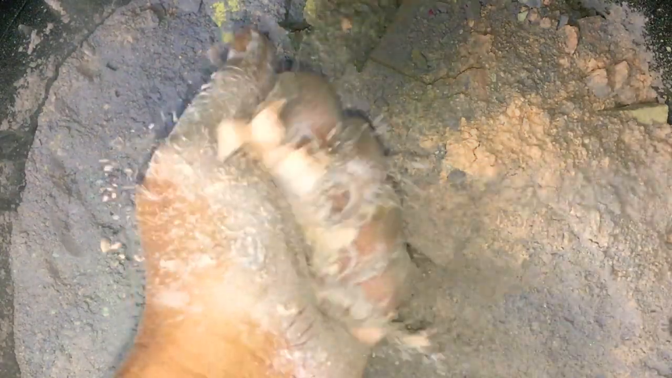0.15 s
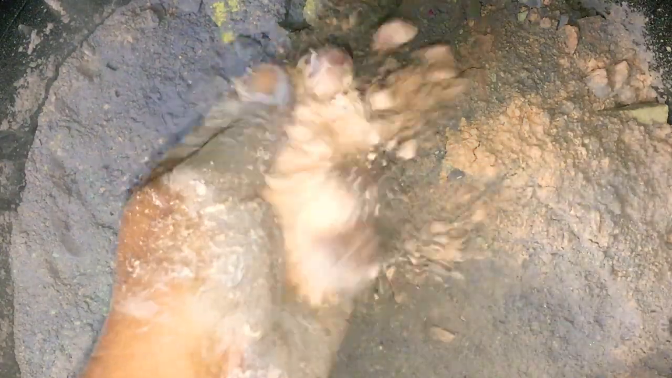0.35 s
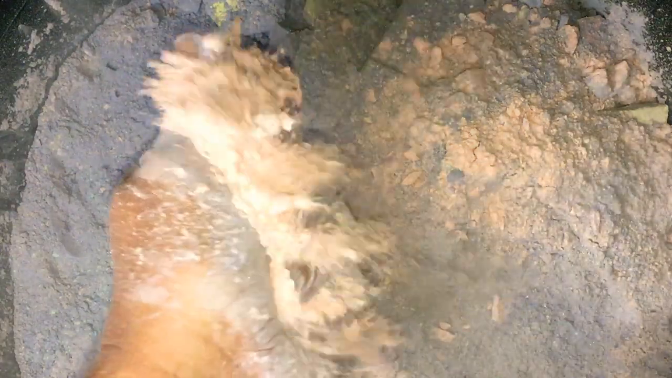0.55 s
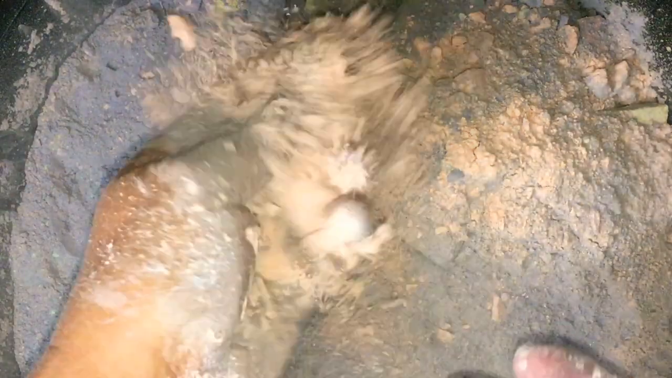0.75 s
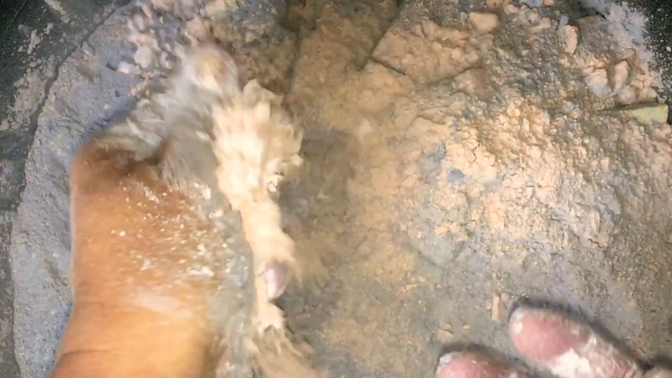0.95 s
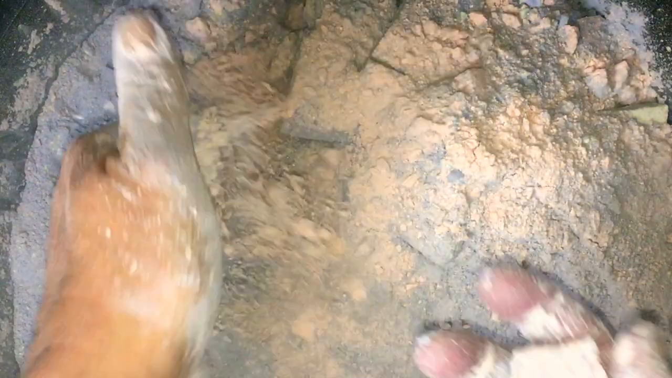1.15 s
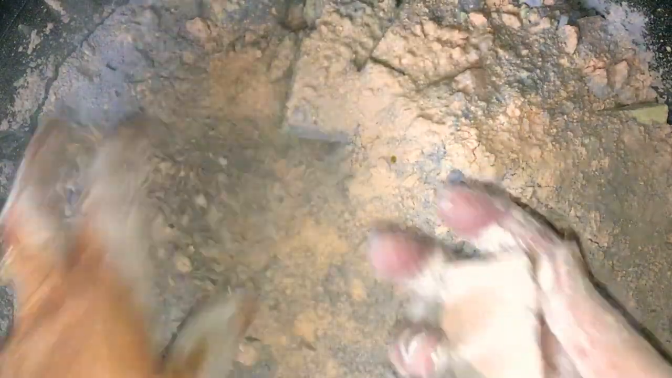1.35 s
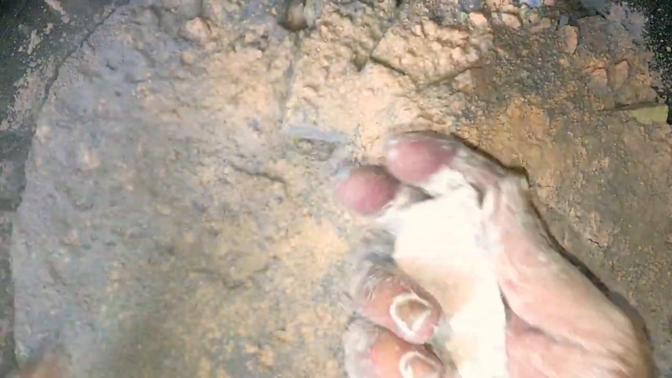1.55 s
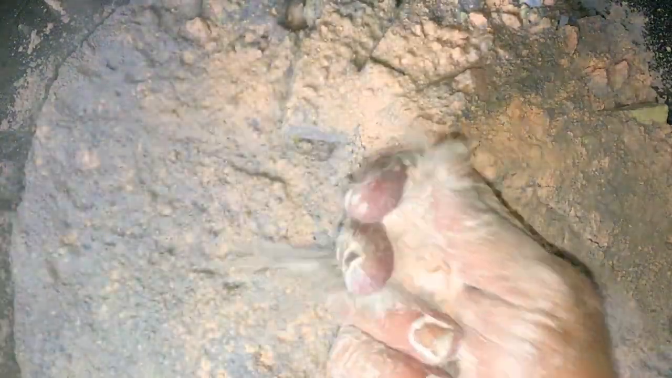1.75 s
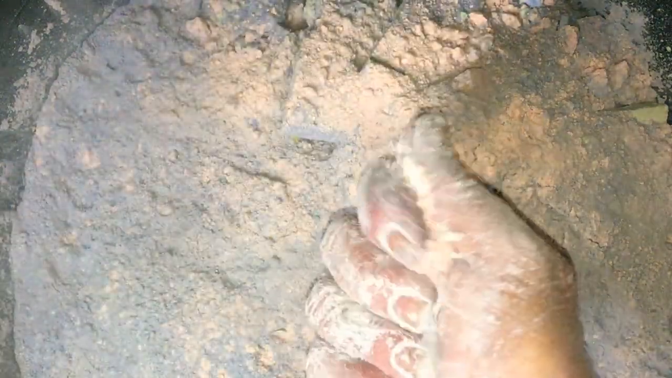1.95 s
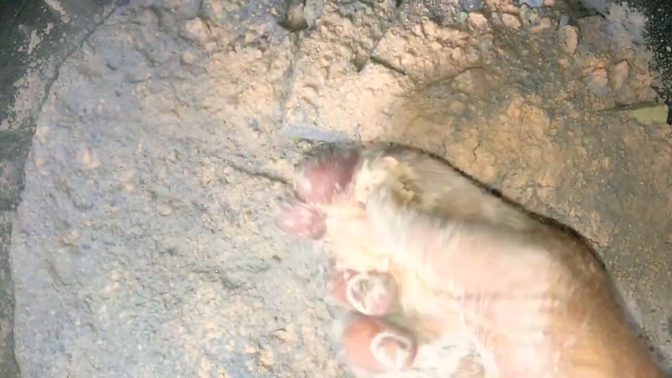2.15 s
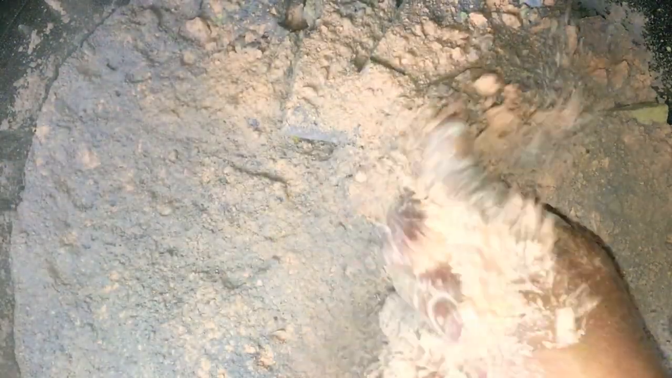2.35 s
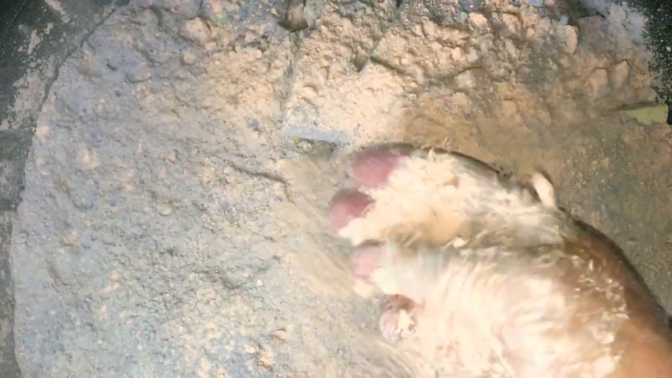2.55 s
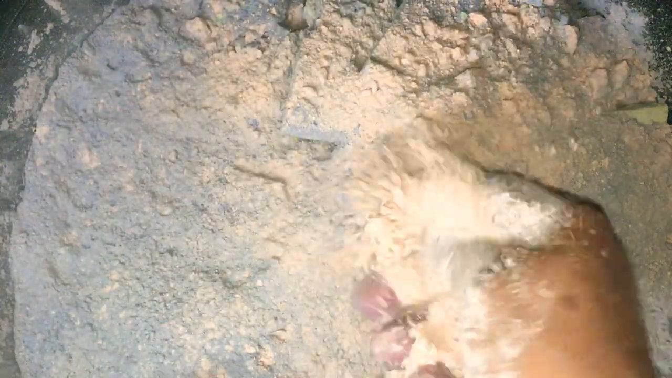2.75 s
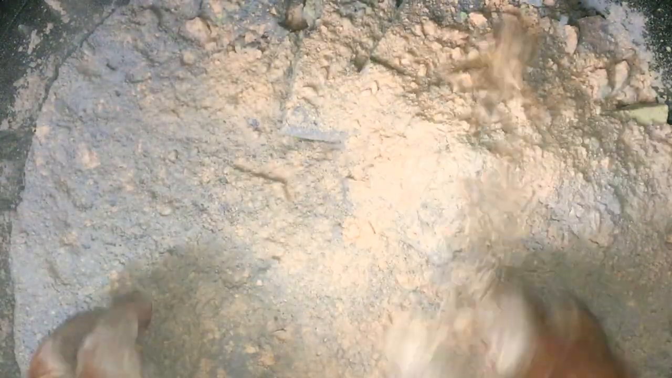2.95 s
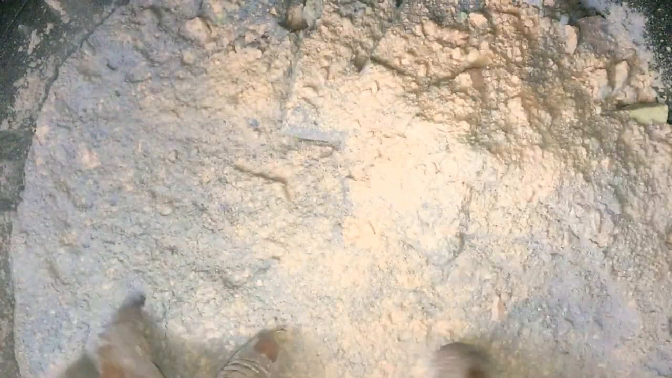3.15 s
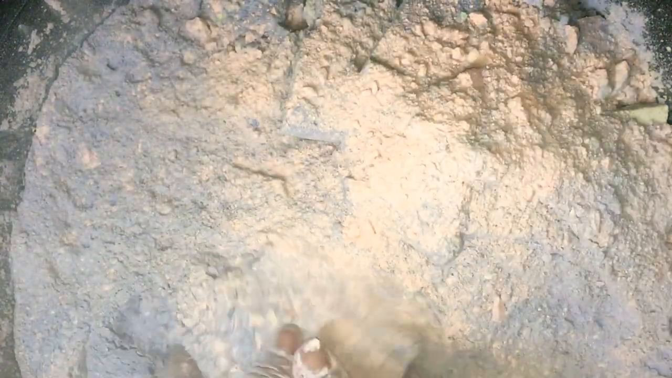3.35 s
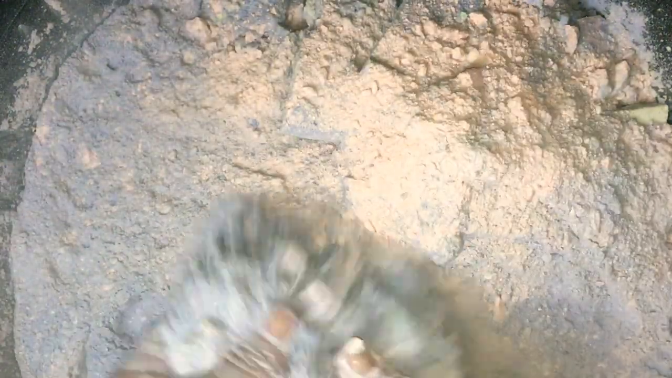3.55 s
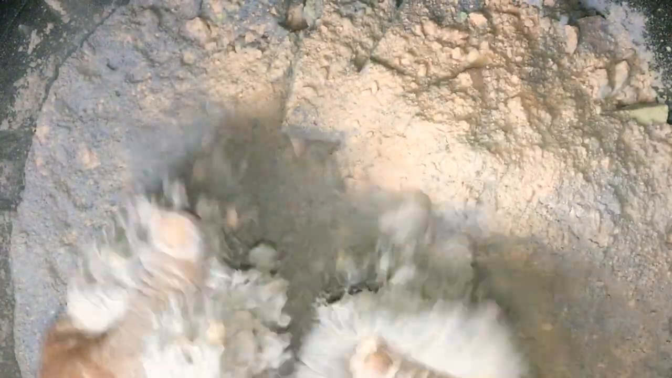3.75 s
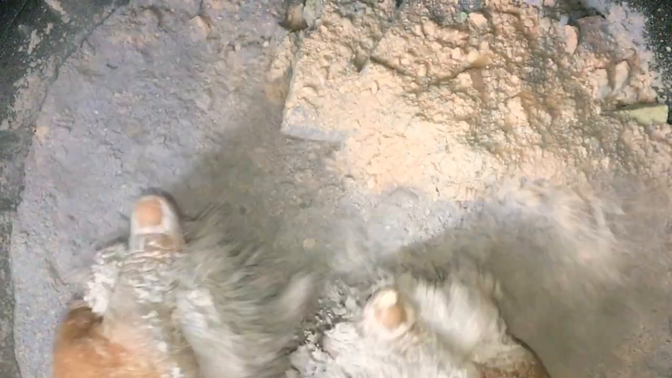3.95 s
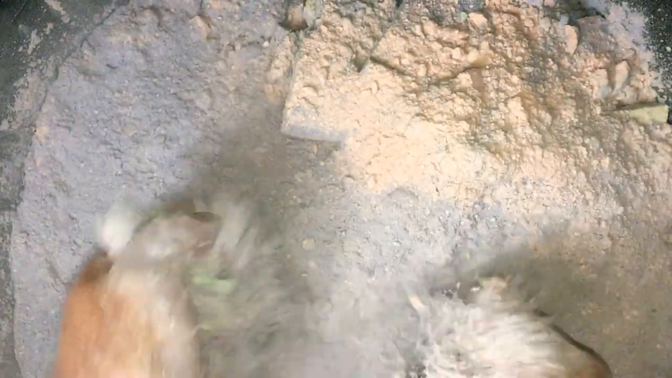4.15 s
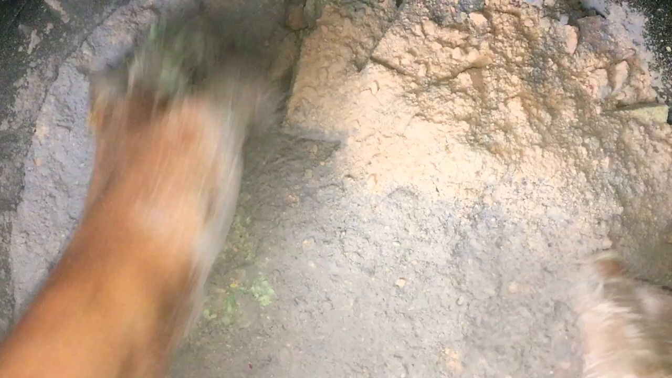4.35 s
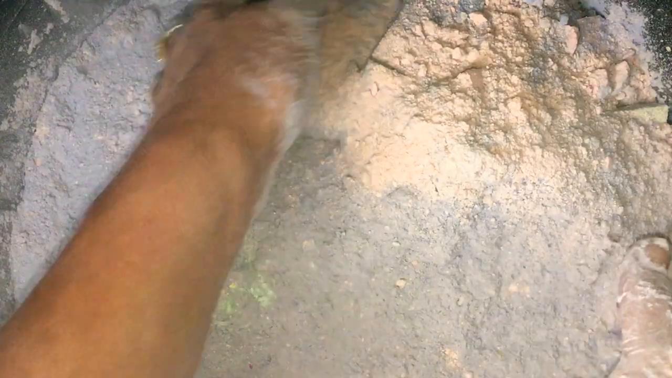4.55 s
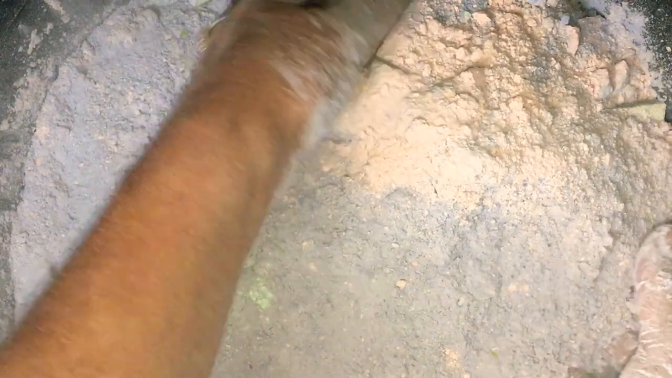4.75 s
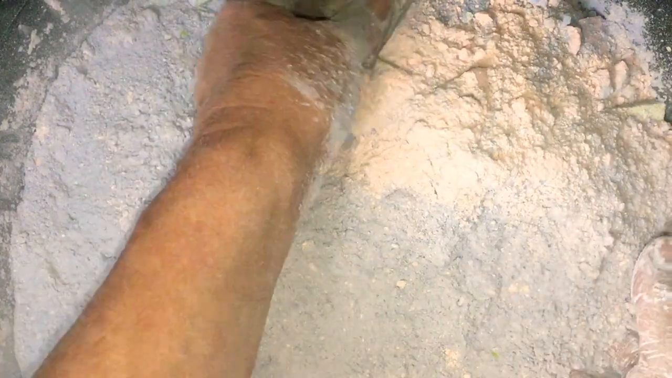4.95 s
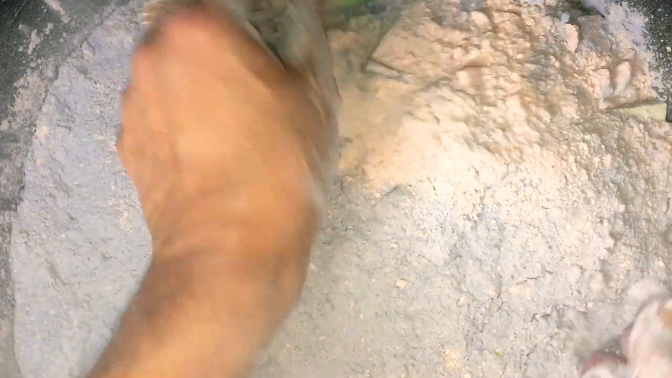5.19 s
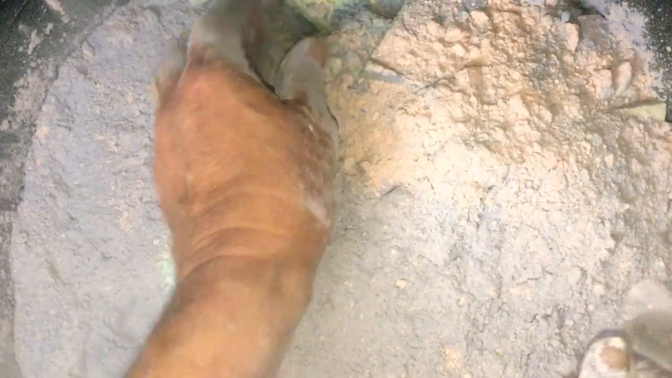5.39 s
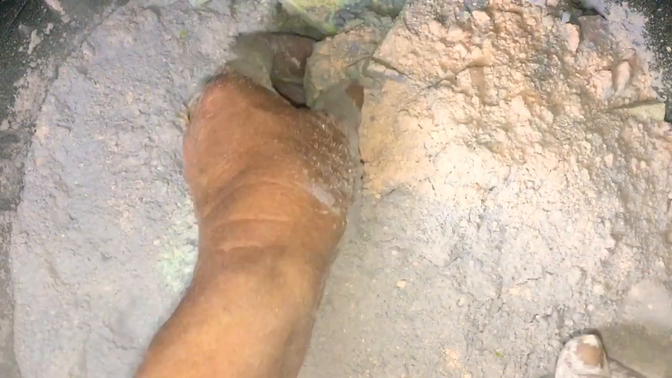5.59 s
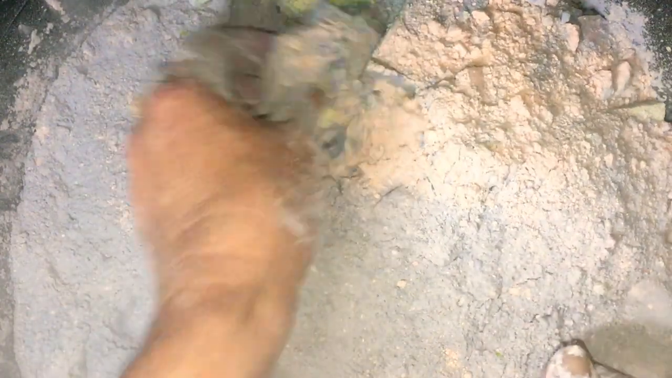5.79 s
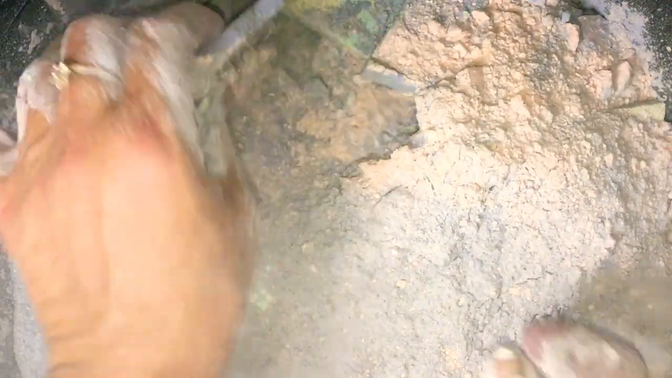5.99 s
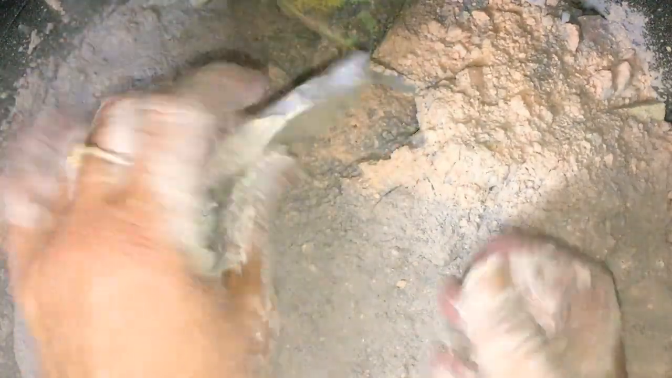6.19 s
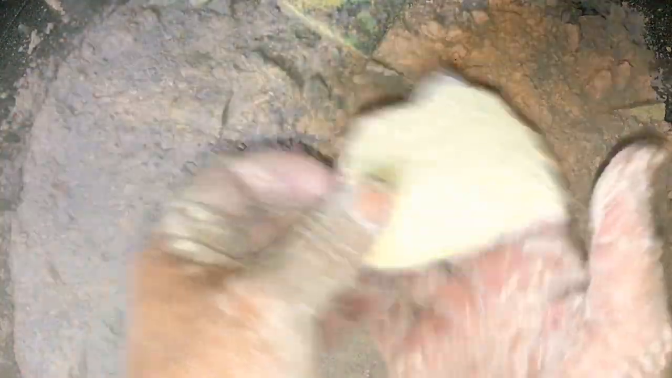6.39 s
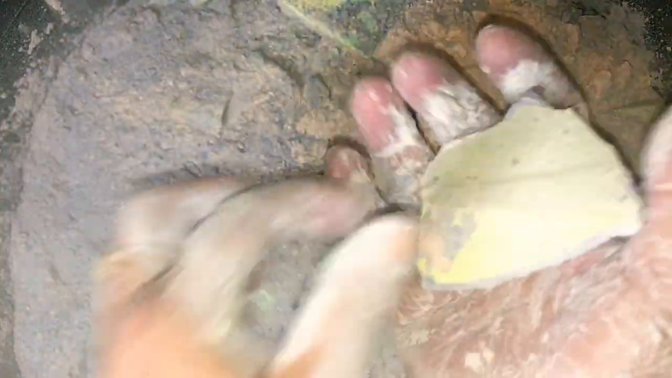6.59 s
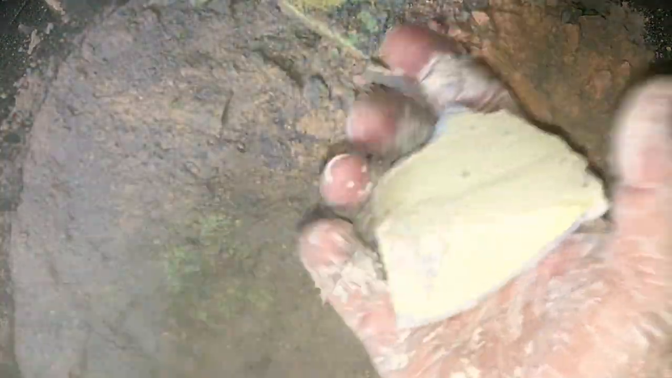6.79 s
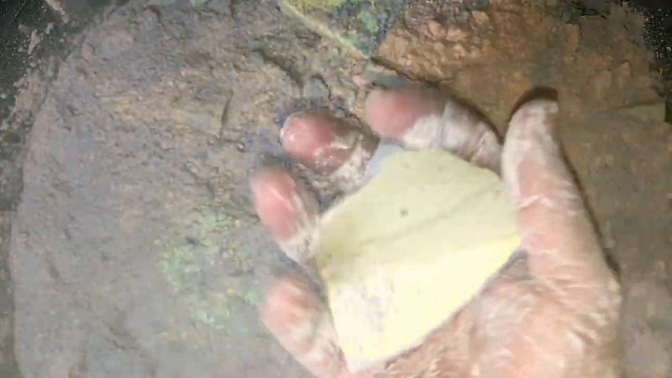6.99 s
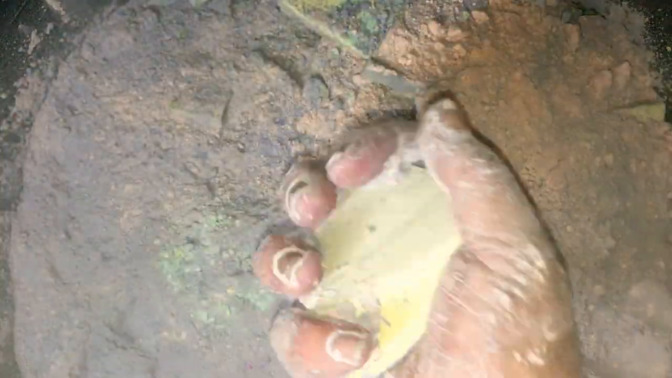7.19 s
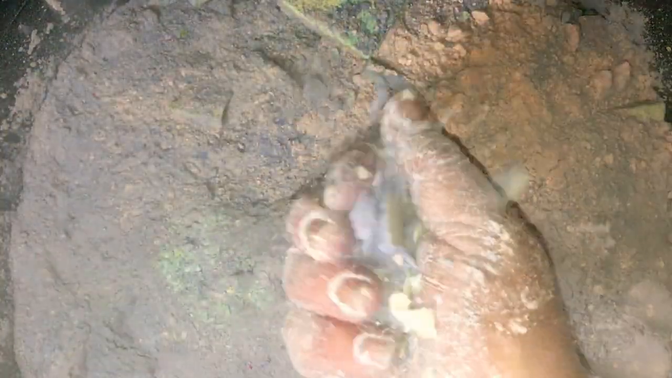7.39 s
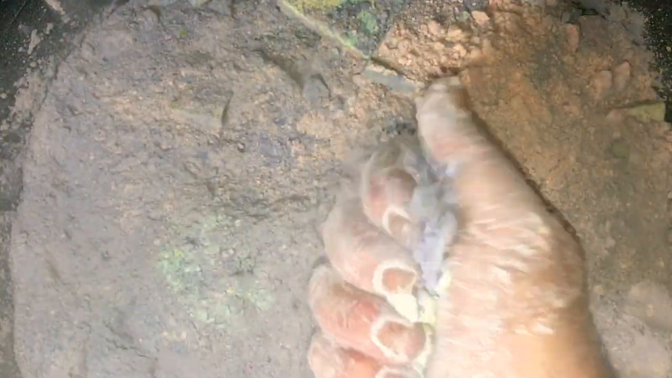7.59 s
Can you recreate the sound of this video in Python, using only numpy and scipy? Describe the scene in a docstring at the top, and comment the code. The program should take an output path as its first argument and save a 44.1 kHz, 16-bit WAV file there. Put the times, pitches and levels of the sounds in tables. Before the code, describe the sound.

Close-up brittle chalk crumbling and soft powder rustling, building to noisy scrabbling with hard knocks and low thuds, then quiet rubbing and a final crunch.

```python
"""Crushing dry gym chalk

Hands crush dry chalk over a tub of loose powder, close to a small microphone.
Lumps snap as decaying modes, powder crumbles as trains of tiny fractures, and chalky skin hisses as shaped noise.
A hand digs through the heap and knocks one block against another; fingers squeak in narrow noise bands.
Low-frequency noise and thuds form the rumble of moving air, present throughout."""
import sys
import numpy as np
from scipy import signal
from scipy.io import wavfile
from scipy.ndimage import uniform_filter1d

SR = 44100
rng = np.random.default_rng(int(sys.argv[2]) if len(sys.argv) > 2 else 0)


def pcm_store(signal):
    """Save signal as 16-bit PCM."""
    levels = np.round(np.clip(np.atleast_2d(signal), -1, 1) * 32767)
    wavfile.write(sys.argv[1], SR, levels.astype(np.int16).T)


N = 336483
TIME = np.arange(N) / SR

# spectrum of powder sheared by skin, also of flying grit: (f/Hz, relative density/dB per Hz)
SKIN_SPECTRUM = [(400, -22.5), (1500, -5.5), (2500, -4.5), (3200, -3), (4300, -1.5), (5000, -2),
                 (6200, -1.5), (8800, -2), (10500, -10), (13000, -19.5), (16000, -28)]


def amp(db):
    """Level definition: an amplitude ratio is 10 to the power dB/20."""
    return 10 ** (np.asarray(db) / 20)


def unit(x):
    """Normalisation to unit root-mean-square value."""
    return x / np.sqrt(np.mean(x ** 2) + 1e-20)


def follow(rows, axis):
    """Linear interpolation of one column of a curve table, sample by sample."""
    rows = np.asarray(rows)
    return np.interp(TIME, rows[:, 0], rows[:, axis])


def add(mix, s, sound):
    """Superposition: a sound is summed into the mix from time s."""
    part = mix[max(round(s * SR), 0):][:len(sound)]
    part += sound[:len(part)]


def colour(x, spectrum, size=8192):
    """Minimum-phase filtering: a causal response of given spectrum keeps the fronts of clicks sharp."""
    hz, db = np.transpose(spectrum)
    bin_hz = abs(np.fft.fftfreq(size, 1 / SR)) + 1
    log_gain = np.log(amp(np.interp(np.log(bin_hz), np.log(hz), db)))
    # the Hilbert transform of the log gain supplies the phase
    transfer = np.exp(np.conj(signal.hilbert(log_gain)))
    response = np.fft.ifft(transfer).real[:size // 2]
    return unit(signal.oaconvolve(x, response)[:len(x)])


def waver(per_s):
    """Random modulation of unit size: straight lines join per_s Gaussian values a second."""
    knots = rng.standard_normal(4096)
    return unit(np.interp(TIME * per_s, np.arange(len(knots)), knots))


def grains(count, per_s, spread_db):
    """Shot noise: sparse impulses of random sign, their levels spread exponentially in dB."""
    size = amp(spread_db * np.minimum(rng.exponential(1, count), 4.5))
    sign = rng.choice([-1., 1.], count)
    return unit(size * sign * (rng.random(count) < per_s / SR))


def struck(x, db):
    """Impact level: the root-mean-square value of the first 10 ms is set to db."""
    return amp(db) * x / np.sqrt(np.mean(x[:SR // 100] ** 2) + 1e-20)


def swell(middle, length):
    """Pressure pulse of one stroke: it builds, peaks and eases off, spanning length between its 1/e points."""
    fall_share, shape = 0.52, 1.65  # part of the length spent easing off; higher shape is flatter on top
    dt = TIME - middle
    reach = abs(dt) / (length * np.where(dt > 0, fall_share, 1 - fall_share))
    near, out = reach < 4, np.zeros(N)
    out[near] = np.exp(-reach[near] ** shape)
    return out


def handwork():
    """Power addition of strokes and sliding: drives of crumbling and hiss, and hiss-weighted treble lift in dB."""
    # loose powder that keeps sliding: (t/s, crumbling drive/dB, hiss drive/dB, treble lift by fine dust/dB)
    sliding = [(0, -63.5, -61.5, 0), (.37, -61.5, -62, 1), (.6, -55.5, -57.5, 1.5), (1.2, -62, -63, 4),
               (1.33, -67, -66.5, -2.5), (1.65, -66, -68.5, 2.5), (2.3, -66.5, -67, 2),
               (2.7, -62.5, -63.5, 0.5), (3.04, -65.5, -68, 0), (3.5, -58.5, -74, 2.5),
               (3.68, -57, -71, -3.5), (3.86, -51.5, -59, -8.5), (4.42, -58, -63, -7.5),
               (4.65, -46, -51.5, 0.5), (5.87, -52.5, -62.5, 3), (6.15, -71.5, -76, 4.5),
               (7.24, -70.5, -67.5, 3), (7.63, -59.5, -59.5, -1.5)]
    # squeezes, rubs and digs of the hand:
    # (middle t/s, length/s, crumbling drive/dB, hiss drive/dB, treble lift by fine dust/dB)
    strokes = [(0.021, 0.16, -48, -57.5, 3), (0.166, 0.043, -58, -56, -0.5), (0.293, 0.067, -58, -51, 5.5),
               (0.463, 0.095, -49, -58, 1.5), (0.746, .09, -58.5, -54, 3), (0.877, 0.14, -51, -50.5, -6.5),
               (1.034, 0.077, -55, -59, 3), (1.137, 0.24, -61.5, -53.5, 3), (1.276, 0.047, -57, -49.5, 7),
               (1.42, 0.076, -59, -65, -11), (1.798, 0.097, -50, -59, 0), (1.968, 0.2, -58, -62.5, -1),
               (2.109, 0.028, -66, -48, 8), (2.162, 0.096, -63, -54, 7.5), (2.28, 0.071, -58, -55.5, 3.5),
               (2.388, 0.091, -58, -51.5, 8.5), (2.493, 0.11, -60.5, -50, 3), (2.708, 0.031, -57.5, -64, 2),
               (2.852, 0.084, -65, -49.5, -3), (3.107, 0.033, -49.5, -55.5, -0.5),
               (3.164, 0.028, -43.5, -55, 4.5), (3.22, 0.11, -45, -43, 5), (3.31, 0.12, -40.5, -46, -2),
               (3.414, 0.1, -53.5, -53, 0), (4.02, 0.24, -49.5, -59, -9.5), (4.231, 0.12, -56.5, -49.5, 3),
               (4.447, 0.021, -45, -59, 0), (4.538, 0.066, -35.5, -46, -0.5),
               (4.626, 0.073, -34, -39.5, 2.5), (4.768, 0.086, -36, -43, 2.5), (4.83, 0.057, -42, -50, 3),
               (4.979, 0.019, -37.5, -36.5, 6.5), (5.096, .1, -46, -44, 2), (5.157, 0.033, -36, -40.5, 0),
               (5.188, 0.033, -48, -38.5, 2), (5.259, 0.087, -39, -46.5, 2),
               (5.342, 0.076, -34.5, -43, 2.5), (5.48, 0.024, -39, -52, 4), (5.592, 0.081, -46, -52.5, 6),
               (5.64, 0.13, -43.5, -52.5, 7), (5.784, 0.061, -46.5, -53, 6.5),
               (5.917, 0.033, -44, -53.5, -2), (6, .1, -57.5, -65.5, -2.5), (6.53, 0.019, -55.5, -53.5, 8),
               (6.581, 0.053, -72, -52.5, 8.5), (6.635, 0.016, -67, -53, 5.5),
               (6.7, 0.048, -69, -53.5, 1.5), (6.736, .015, -67.5, -50.5, 0),
               (6.772, 0.03, -73, -54.5, -1.5), (7.001, 0.21, -74, -58.5, 4), (7.152, 0.017, -67, -54, 8.5),
               (7.348, 0.073, -44, -51, -1.5), (7.53, 0.18, -54.5, -58, 1.5)]
    crush_power = amp(follow(sliding, axis=1)) ** 2
    rub_power = amp(follow(sliding, axis=2)) ** 2
    weighted_lift = rub_power * follow(sliding, axis=3)
    for middle, length, crumble_db, hiss_db, lift_db in strokes:
        pressure = swell(middle, length)
        hiss_power = (amp(hiss_db) * pressure) ** 2
        crush_power = crush_power + (amp(crumble_db) * pressure) ** 2
        rub_power = rub_power + hiss_power
        weighted_lift = weighted_lift + lift_db * hiss_power
    return np.sqrt(crush_power), np.sqrt(rub_power), weighted_lift / rub_power


def air(crush):
    """Pressure fluctuation at the microphone: air rumbles, strokes thud softly, shoves add gusts and thuds."""
    # spectra of moving air and of thuds: (f/Hz, relative density/dB per Hz)
    rumble_spectrum = [(8, -12), (25, -3), (42, 0), (75, -10), (140, -17), (200, -26), (300, -42),
                       (1000, -80)]
    thud_spectrum = [(30, -12), (70, -2), (110, 1), (170, -2), (250, -3), (330, -9), (600, -28),
                     (2000, -60)]
    # the hand shoves powder and air: (middle t/s, length/s, peak gust level/dB, peak thud level/dB)
    shoves = [(3.275, 0.15, -37.5, -44.5), (4.455, .02, -49.5, -43), (4.545, 0.04, -31, -33),
              (4.637, 0.074, -27.5, -32.5), (4.788, 0.11, -31, -32), (4.95, 0.17, -40, -69),
              (5.166, 0.031, -29.5, -30), (5.262, 0.068, -24.5, -32), (5.347, .09, -23.5, -32),
              (5.667, 0.065, -41, -35), (5.739, 0.16, -34, -46), (5.96, .04, -49, -44.5)]
    rumble_db, thud_db = -44, -61.5  # steady parts
    # soft thud level under a stroke that crumbles at dig_db, and its growth with force
    shove_db, dig_db, shove_power = -38, -35, 1.2
    gust_power = amp(rumble_db) ** 2
    stroke_thud = amp(shove_db) * (crush / amp(dig_db)) ** shove_power
    thud_power = amp(thud_db) ** 2 + stroke_thud ** 2
    for middle, length, gust_peak_db, thud_peak_db in shoves:
        pressure = swell(middle, length)
        gust_power = gust_power + (amp(gust_peak_db) * pressure) ** 2
        thud_power = thud_power + (amp(thud_peak_db) * pressure) ** 2
    rumble = np.sqrt(gust_power) * colour(rng.standard_normal(N), rumble_spectrum)
    thuds = colour(grains(N, per_s=900, spread_db=3.5), thud_spectrum)
    return rumble + np.sqrt(thud_power) * thuds


def self_noise():
    """Stationary random noise: the steady hiss of the microphone."""
    # its spectrum: (f/Hz, relative density/dB per Hz)
    noise_spectrum = [(100, 0), (2000, -2.5), (9000, -5), (16000, -9.5)]
    return amp(-76) * colour(rng.standard_normal(N), noise_spectrum)


def crumbling(crush):
    """Shot-excited resonance: fractures ring crumbs of several sizes over the rustle of sliding powder."""
    # (f/Hz, relative density/dB per Hz)
    rustle_spectrum = [(120, -25.5), (300, 3.5), (600, 6), (900, 1), (1350, 2), (2000, -7.5), (3000, -10.5),
                       (5000, -13), (9000, -24.5), (16000, -58.5)]
    rustle = colour(grains(N, per_s=2500, spread_db=2.5), rustle_spectrum)
    t = np.arange(600) / SR
    crumbs = np.zeros(N)
    for hz in np.geomspace(600, 3000, num=10):
        ring = np.sin(2 * np.pi * hz * t) * np.exp(-hz * t / 1.5)
        ringing = unit(signal.oaconvolve(grains(N, per_s=60, spread_db=2.0), ring)[:N])
        crumbs += ringing * amp(-4 * abs(np.log2(hz / 1350)))  # 4 dB per octave away from 1350 Hz
    clumping = amp(2.3 * waver(70))
    return crush * clumping * (amp(-2.5) * rustle + amp(-6.0) * unit(crumbs))


def chips(crush):
    """Brittle fracture: single crumbs crack with a sharp tick, louder under more pressure."""
    # tick of a cracking crumb: (f/Hz, relative density/dB per Hz)
    tick_spectrum = [(300, -19.5), (1400, 1), (3000, -5), (7000, -11.5), (15000, -28.5)]
    ticks = colour(grains(N, per_s=25, spread_db=5), tick_spectrum)
    return crush * amp(-13) * ticks


def skin(crush, rub, lift_db):
    """Shear friction: powder between fingers hisses, brighter in fine dust, gritty where crumbs are caught."""
    grit = np.minimum(crush / rub, 1)
    drive = rng.standard_normal(N) + amp(-8) * grit * grains(N, per_s=600, spread_db=11)
    hz, t, z = signal.stft(colour(drive, SKIN_SPECTRUM), SR, nperseg=512)
    top = np.interp(hz, [8000, 12000], [0, 1])[:, None]
    # the hollows between the fingers shift and colour the hiss
    across_hz = uniform_filter1d(rng.standard_normal(z.shape), size=4, axis=0)
    hollows_db = 2.2 * unit(uniform_filter1d(across_hz, size=14, axis=1))
    gain = amp(np.interp(t, TIME, lift_db) * top + hollows_db)
    hiss = unit(signal.istft(z * gain, SR, nperseg=512)[1][:N])
    return hiss * rub * amp(1.6 * waver(110))


def spray(db, t60, count=4096):
    """Decaying noise burst: grit flies off a fresh break or contact."""
    t = np.arange(count) / SR
    burst = amp(-60 * t / t60) * (1 - np.exp(-t / 0.00063))
    return struck(colour(rng.standard_normal(count) * burst, SKIN_SPECTRUM, size=512), db)


def snaps():
    """Modal ringing: each break or bump rings its lump briefly, then the crack runs on in smaller fractures."""
    # lumps that snap or knock, levels over the first 10 ms before the palm colours them:
    # (t/s, ring level/dB, base f/Hz, spray level/dB, spray 60 dB decay/s)
    breaks = [(.023, -43.5, 1085, -49, 0.026), (.2587, -48.5, 1600, -68, .019),
              (0.443, -45, 1050, -50.5, 0.03), (0.5011, -38.5, 587, -62, 0.022),
              (0.5066, -39, 1120, -52, 0.0056), (.571, -37, 1290, -55, .015),
              (0.6026, -37, 900, -70, 0.0061), (0.6125, -35.5, 896, -72, 0.0099),
              (.6864, -46, 1400, -66, 0.011), (.7534, -44.5, 840, -54, 0.003),
              (0.831, -43.5, 1260, -59, 0.012), (0.8506, -43, 915, -69, .0056),
              (0.8777, -43.5, 1290, -59, 0.022), (0.8876, -43.5, 1340, -51, 0.014),
              (0.9442, -43, 1360, -49, 0.0071), (0.978, -48, 990, -69, 0.014),
              (0.9979, -33.5, 1740, -46, 0.0052), (1.012, -50, 1230, -64, .01),
              (1.0784, -48.5, 570, -57, 0.023), (1.101, -42, 2020, -39.5, 0.0083),
              (1.4267, -53, 600, -77, 0.01), (1.442, -57, 1810, -57, 0.0058),
              (1.535, -48, 1230, -80, 0.014), (1.6268, -52, 604, -68, 0.0071),
              (1.6916, -55, 1800, -60, 0.02), (1.7256, -46.5, 650, -68, .013),
              (1.737, -46, 1010, -62, 0.016), (1.7718, -46, 716, -52.5, 0.035),
              (1.81, -48, 1060, -63, 0.031), (2.5628, -59, 2280, -48.5, 0.0044),
              (2.62, -55, 1440, -74, .036), (3.1, -49.5, 1286, -55, 0.017), (3.137, -46.5, 1650, -64, .008),
              (3.1532, -43, 1350, -73, 0.022), (3.7555, -44.5, 780, -69, 0.0015),
              (3.791, -32, 376, -64, 0.012), (3.8575, -46, 595, -72, .013), (3.9638, -40, 1710, -54, 0.021),
              (3.9717, -40.5, 670, -52.5, .023), (4.0147, -42, 1500, -55, .0066),
              (4.027, -47, 1500, -64, 0.0065), (4.31, -47, 1640, -78, .0051),
              (4.535, -31.5, 1145, -56, 0.037), (4.612, -30, 1053, -39.5, 0.089),
              (4.7552, -36, 774, -59, 0.013), (5.2682, -25, 1290, -30.5, 0.035),
              (5.3194, -32, 605, -54, 0.024), (5.3513, -48, 900, -41, 0.01),
              (5.644, -21.5, 513, -42.5, 0.03), (5.6556, -24.5, 543, -71, 0.045),
              (5.6633, -30, 1580, -53, 0.019), (5.666, -28, 395, -65, 0.027),
              (5.8027, -44.5, 770, -50, 0.0071), (5.861, -33.5, 440, -53.5, 0.052),
              (5.9476, -47, 1040, -62, .027), (5.9656, -44, 473, -70, 0.011),
              (6.0682, -51, 1410, -56.5, 0.031), (7.1032, -58, 2142, -56.5, 0.016),
              (7.1794, -64.5, 2080, -52, 0.0099), (7.251, -60, 820, -56, 0.027),
              (7.3004, -47.5, 1970, -49.5, 0.021), (7.316, -44, 1620, -50, 0.019),
              (7.3378, -42.5, 1180, -64, 0.0061), (7.3556, -37, 1300, -46, 0.035),
              (7.5738, -38, 1670, -49.5, 0.0064), (7.5798, -41.5, 790, -55, 0.012)]
    # modes of a lump: (multiple of base f, relative level/dB)
    lump_modes = [(.5, -8), (.93, 2), (1.2, 0), (1.72, -2.5), (2.4, -3)]
    out, t = np.zeros(N), np.arange(4096) / SR
    for s, db, hz, spray_db, t60 in breaks:
        # a clean break sprays grit and starts sharply; a soft bump builds more slowly and is duller
        sharp = np.clip(1 + (spray_db - db) / 30, 0, 1)
        rise = (.75 - 0.35 * sharp) / hz
        ring = np.zeros(len(t))
        for ratio, mode_db in lump_modes:
            level = amp(mode_db - 15 * (1 - sharp) * max(ratio - 1.2, 0))
            mode_hz = hz * ratio * rng.uniform(0.97, 1.02)
            ring += level * np.sin(2 * np.pi * mode_hz * t + rng.uniform(-1.2, 1))
        # the ring decays in 0.7 of the spray's time
        ring *= amp(-60 * t / (0.7 * t60)) * (1 - np.exp(-(t / rise) ** 2))
        after = grains(len(t), per_s=2000, spread_db=0.5) * np.exp(-t / 0.0055)
        crack = amp(-8.0) * after / (np.linalg.norm(after) + 1e-9)
        crack[0] += 1
        sign = rng.choice([-1, 1])
        add(out, s, sign * struck(signal.fftconvolve(crack, ring)[:len(t)], db))
        add(out, s, spray(spray_db, t60))
    return out


def palm(x):
    """Cavity resonance: a cupped hand colours whatever sounds inside it."""
    # how far the hand is cupped round the chalk: (t/s, share 0-1)
    cupping = [(1.6, 0.25), (1.8, 0.63), (2.05, 0.47), (2.3, 0.4), (3.0, 0), (6.3, 0.11), (6.55, 0.59),
               (7.2, 0.46), (7.6, 0.23)]
    # colour of the hollow at a share of 1: (f/Hz, gain/dB)
    cavity = [(400, 5.5), (800, -10.5), (1350, -5), (1750, -3), (2300, 2.5), (2700, -8), (3100, -10.5),
              (3700, 3), (4600, 2.5), (5600, 3.5), (8000, 0.5), (10000, -3), (11500, 3)]
    hz, t, z = signal.stft(x, SR, nperseg=256)
    cavity_db = np.interp(hz, *np.transpose(cavity))
    share = np.interp(t, *np.transpose(cupping))
    return signal.istft(z * amp(np.outer(cavity_db, share)), SR, nperseg=256)[1][:N]


def squeak():
    """Stick-slip friction: a finger on packed powder narrows the hiss into breathy bands."""
    # (middle t/s, half length to 1/e/s, centre f/Hz, offset of -12 dB points/Hz, band level before fading/dB)
    slips = [(2.85, 0.033, 5500, 260, -52), (2.848, 0.027, 6560, 260, -55),
             (5.869, 0.0088, 2250, 220, -48.5), (6.637, 0.0075, 4730, 501, -57),
             (6.693, 0.017, 4680, 496, -55.5), (6.708, 0.045, 2600, 320, -63.5),
             (7.222, 0.072, 2280, 201, -72), (7.307, 0.01, 2250, 350, -47.5),
             (7.362, 0.0093, 4000, 700, -44.5)]
    out = np.zeros(N)
    t = np.arange(-SR // 8, SR // 8) / SR
    for s, length, hz, width, db in slips:
        band = [(.6 * hz, -45), (hz - width, -12), (hz, 0), (hz + width, -12), (1.5 * hz, -45)]
        breath = colour(rng.standard_normal(len(t)), band)
        add(out, s + t[0], amp(db) * breath * np.exp(-(t / length) ** 4))
    return out


def clack():
    """Contact stiffness: two quick hits ring a hard piece; the second, harder one excites higher modes."""
    # a hard piece hits another and bounces at once, levels over the first 10 ms before the palm:
    # (t/s, ring level/dB, highest well-excited f/Hz, spray level/dB)
    contacts = [(4.4391, -19.5, 1690, -37), (4.4426, -18.5, 3550, -40.5)]
    # modes of the piece: (f/Hz, relative level/dB, 60 dB decay/s)
    piece_modes = [(569, -23, 0.034), (938, -15, 0.017), (1190, -2.5, .02), (1476, -0.5, 0.0083),
                   (2120, -5.5, 0.016), (2650, -5, 0.0081), (3200, -0.5, .006), (3800, -4.5, 0.0062),
                   (4478, -10, .005)]
    out, t = np.zeros(N), np.arange(4096) / SR
    for s, db, reach_hz, spray_db in contacts:
        ring = np.zeros(len(t))
        for k, (hz, mode_db, t60) in enumerate(piece_modes):
            level = amp(mode_db - 60 * t / t60) / (1 + (hz / reach_hz) ** 4)
            ring += (-1) ** k * level * np.sin(2 * np.pi * hz * t)
        add(out, s, struck(ring, db))
        add(out, s, spray(spray_db, 0.013))
    return out


def knock():
    """Modal ringing with soft saturation: the big block gives a dull, short clack and a spray of grit."""
    # modes of the block before saturation: (f/Hz, relative level/dB, 60 dB decay/s)
    block_modes = [(285, -9, 0.061), (397, -15.5, 0.093), (680, 2.5, 0.032), (885, -7, 0.027),
                   (1056, -6.5, 0.039), (1226, -3.5, 0.033), (1507, -4, 0.04), (2010, -6.5, 0.024),
                   (2453, -21.5, 0.04), (2910, -19, .04), (3600, -31.5, 0.034)]
    knock_s, knock_db = 5.2564, -11
    out, t = np.zeros(N), np.arange(SR // 4) / SR
    ring = np.zeros(len(t))
    for k, (hz, db, t60) in enumerate(block_modes):
        ring += (-1) ** k * amp(db - 60 * t / t60) * np.sin(2 * np.pi * hz * t)
    # soft saturation rounds off the strongest swings
    ring = np.tanh(struck(ring, -11.5))
    add(out, knock_s, struck(ring, knock_db))
    add(out, knock_s, spray(-28.5, 0.026))
    return out


def room(x, t60, wet_db):
    """Reverberation: faint, quick reflections from the tub and the walls follow the direct sound."""
    t = np.arange(SR // 2) / SR
    tail = grains(len(t), per_s=4100, spread_db=-7.0) * amp(-60 * t / t60) * (t > .003)
    return x + amp(wet_db) * signal.fftconvolve(x, tail / np.linalg.norm(tail))[:N]


def scene():
    """Superposition: the palm colours the chalk, the room reflects it, and air and hiss are added."""
    crush, rub, lift_db = handwork()
    impacts = snaps() + clack() + knock()
    powder = crumbling(crush) + chips(crush) + skin(crush, rub, lift_db)
    chalk = palm(impacts + powder + squeak())
    hiss = self_noise()
    return (room(chalk, t60=0.09, wet_db=-23) + air(crush) + hiss)[None]


def record(dry):
    """Band limitation: a linear-phase low-pass at 15950 Hz sets the upper edge of the spectrum."""
    low_pass = signal.firwin(511, 15950, window=("kaiser", 9), fs=SR)
    return signal.oaconvolve(dry, low_pass[None], "same")


dry = scene()
out = record(dry)
pcm_store(out)
```